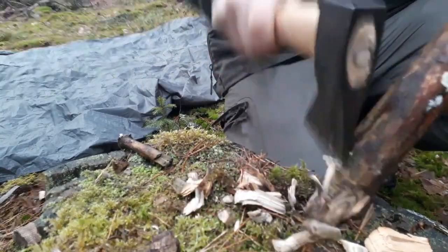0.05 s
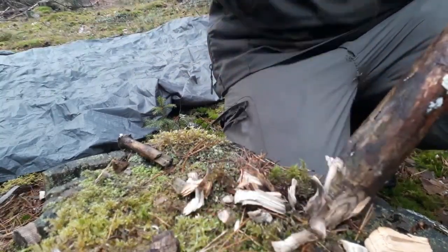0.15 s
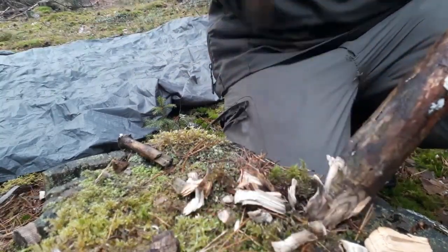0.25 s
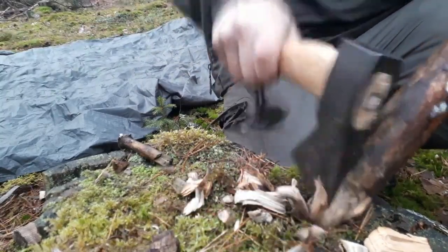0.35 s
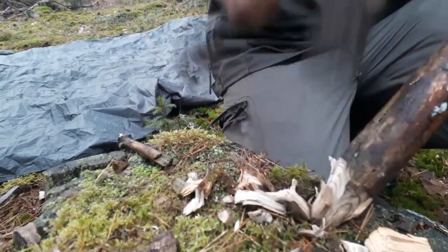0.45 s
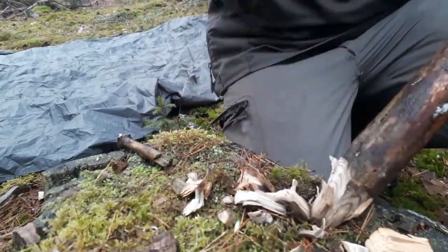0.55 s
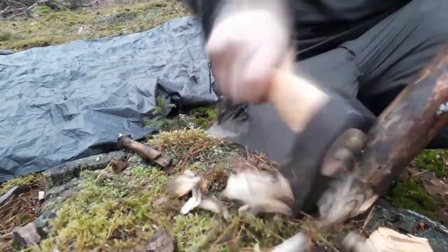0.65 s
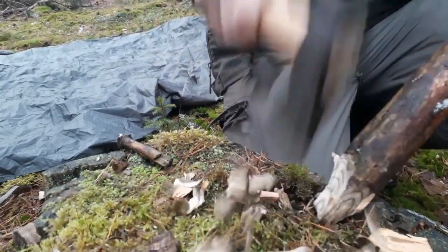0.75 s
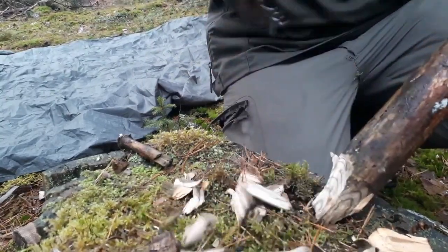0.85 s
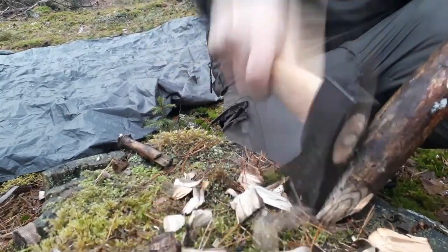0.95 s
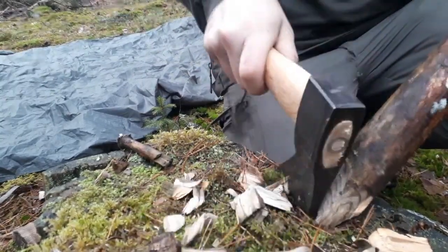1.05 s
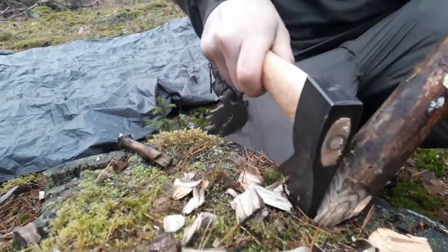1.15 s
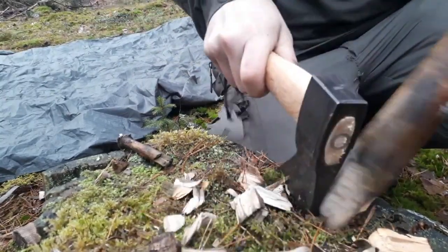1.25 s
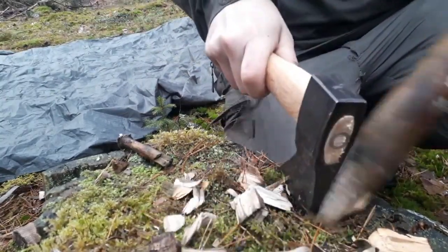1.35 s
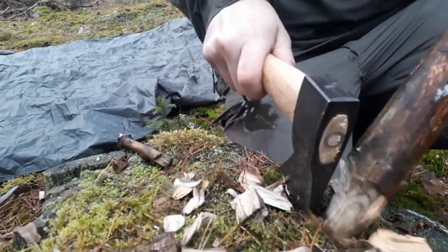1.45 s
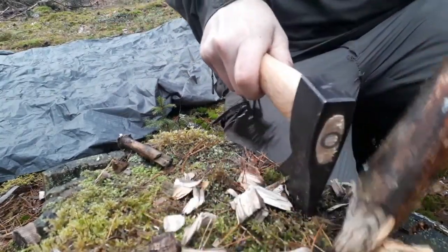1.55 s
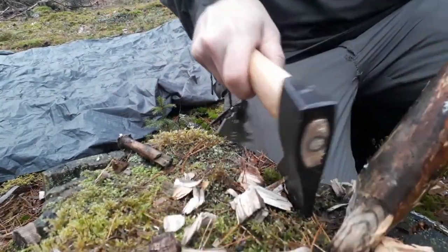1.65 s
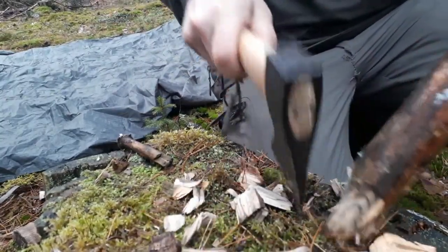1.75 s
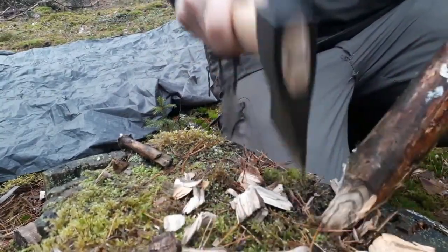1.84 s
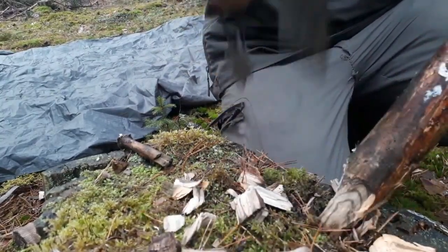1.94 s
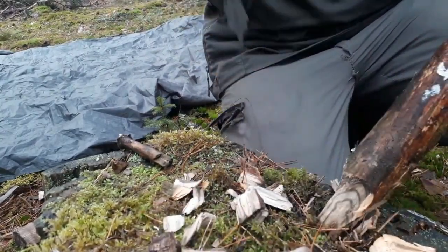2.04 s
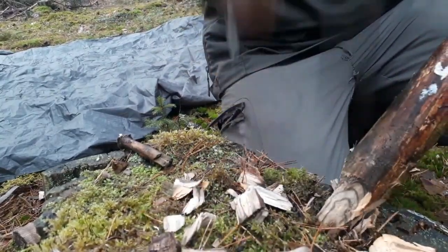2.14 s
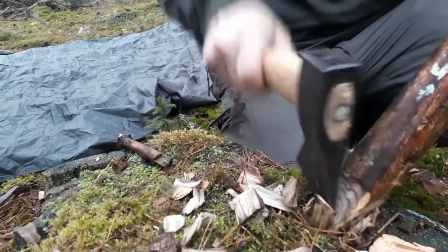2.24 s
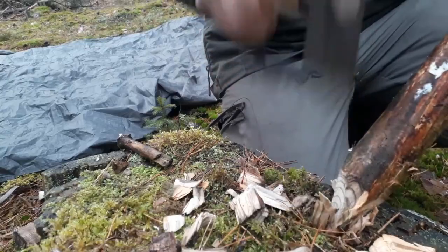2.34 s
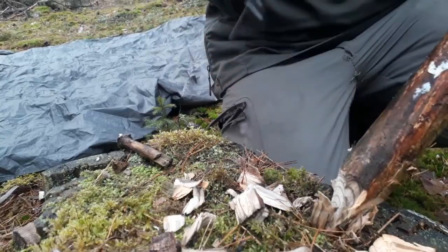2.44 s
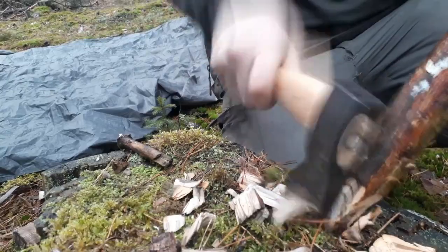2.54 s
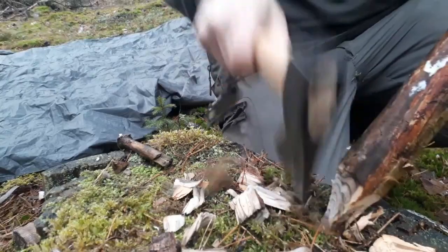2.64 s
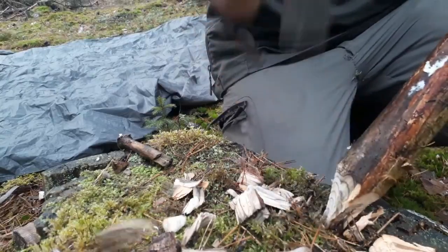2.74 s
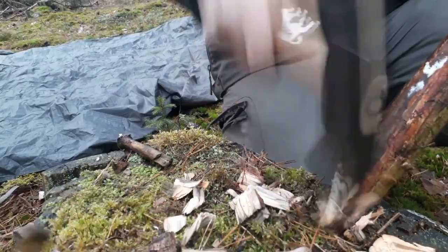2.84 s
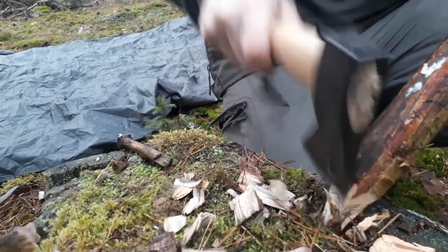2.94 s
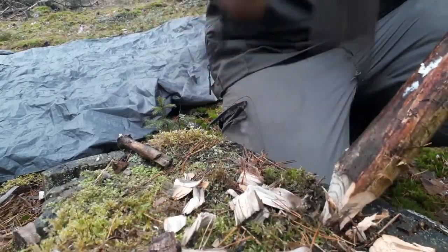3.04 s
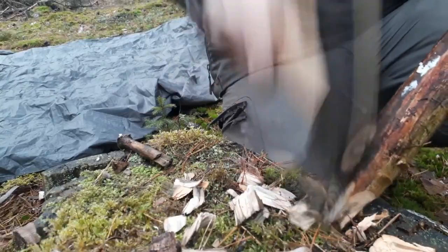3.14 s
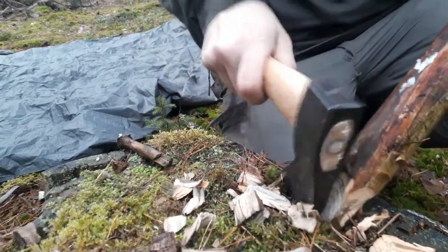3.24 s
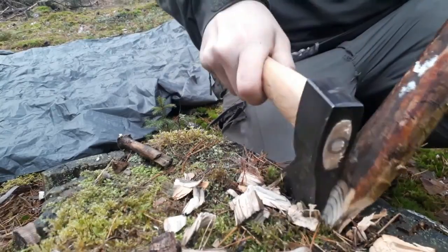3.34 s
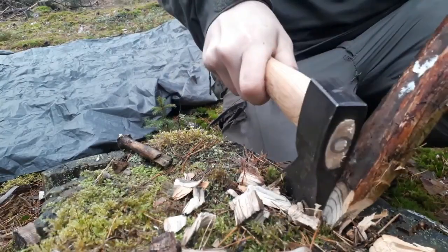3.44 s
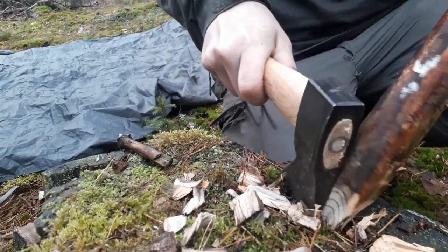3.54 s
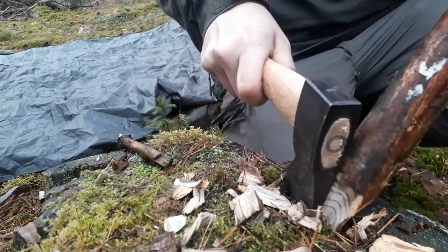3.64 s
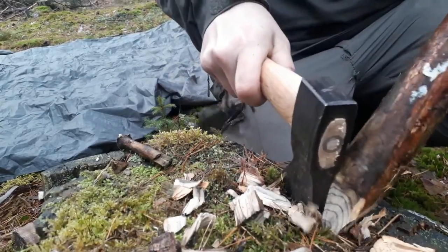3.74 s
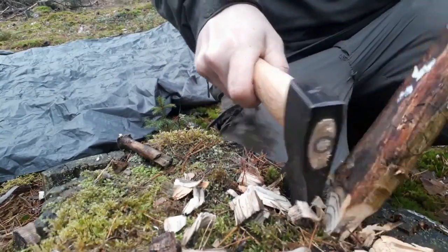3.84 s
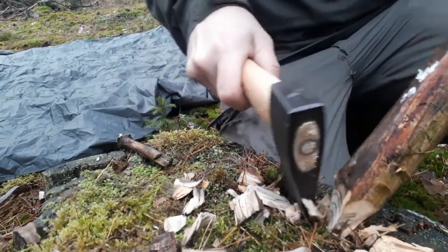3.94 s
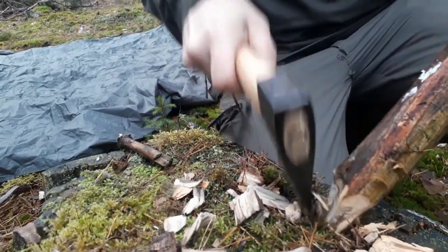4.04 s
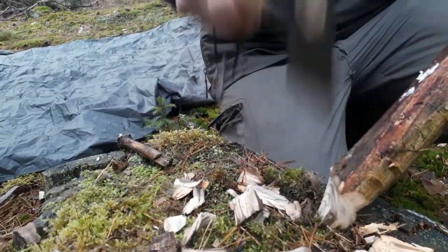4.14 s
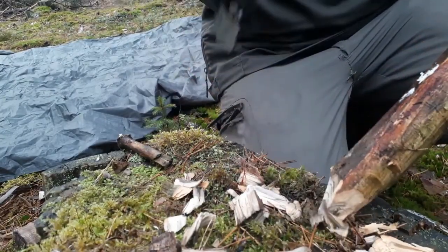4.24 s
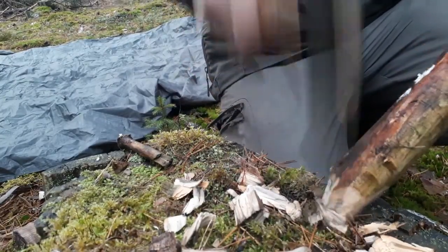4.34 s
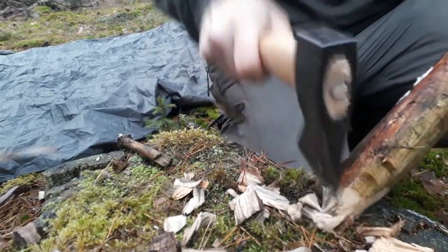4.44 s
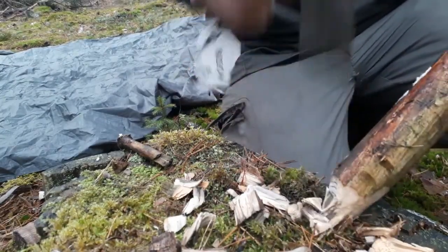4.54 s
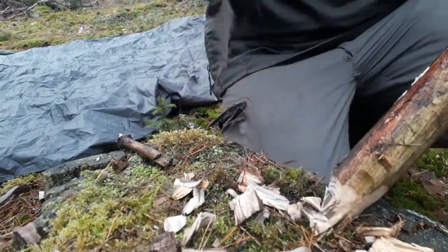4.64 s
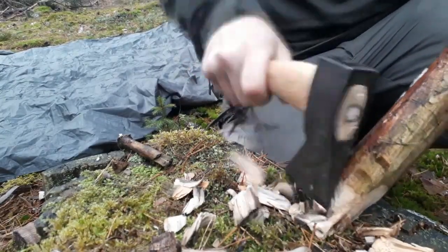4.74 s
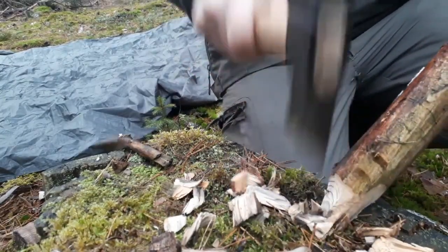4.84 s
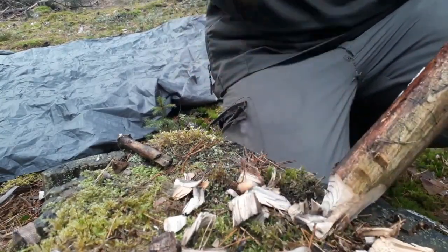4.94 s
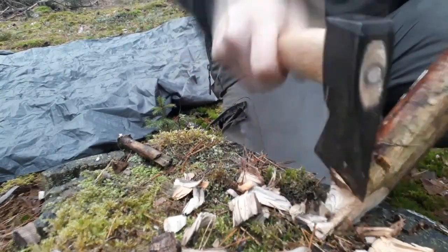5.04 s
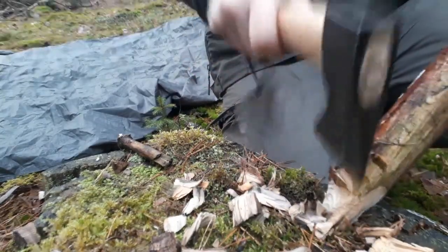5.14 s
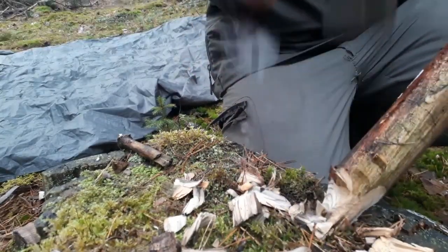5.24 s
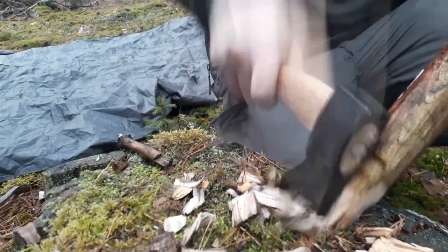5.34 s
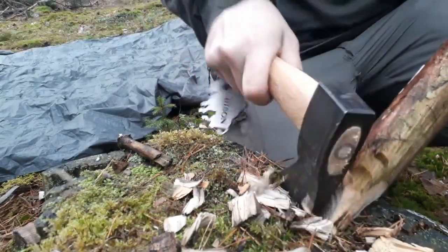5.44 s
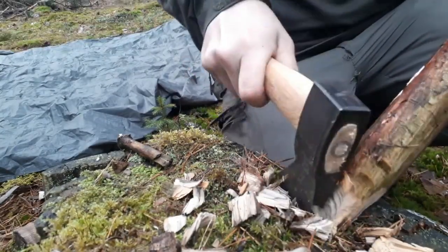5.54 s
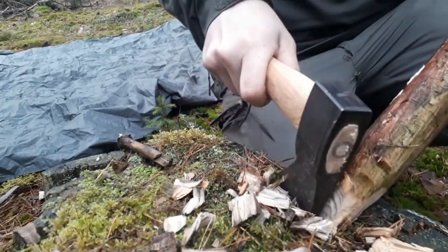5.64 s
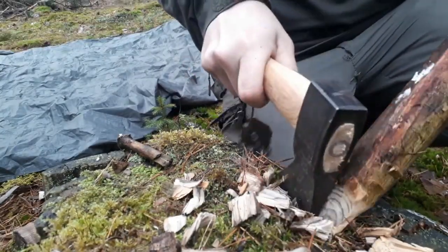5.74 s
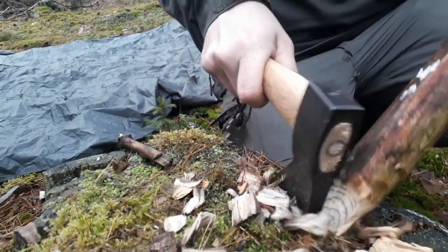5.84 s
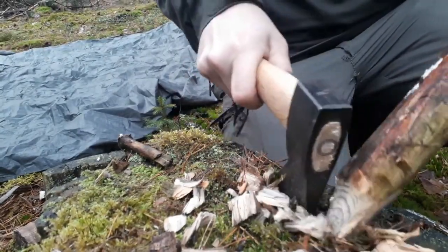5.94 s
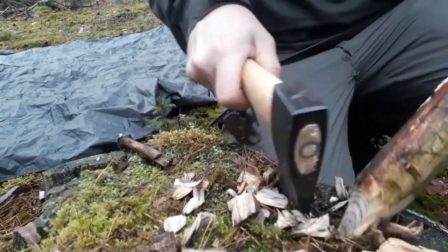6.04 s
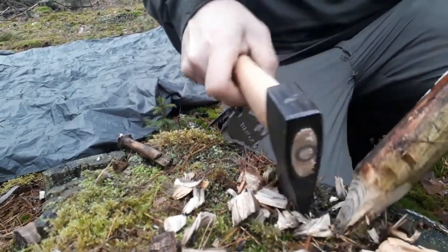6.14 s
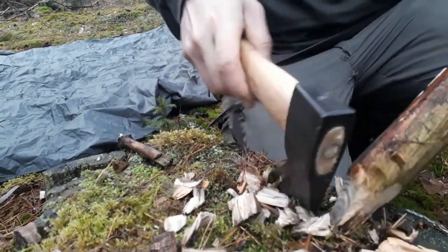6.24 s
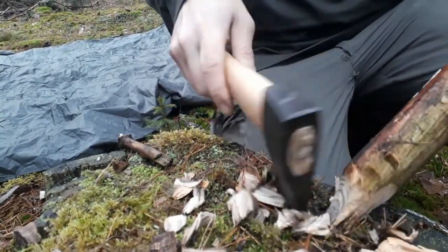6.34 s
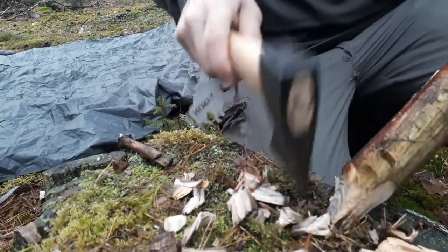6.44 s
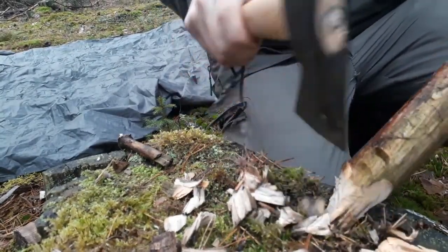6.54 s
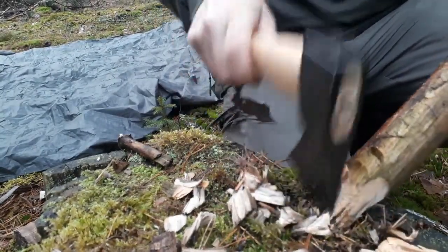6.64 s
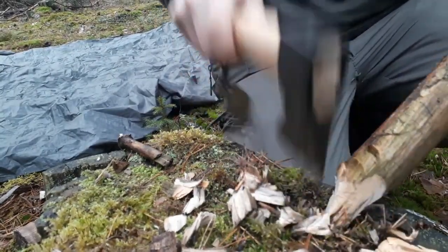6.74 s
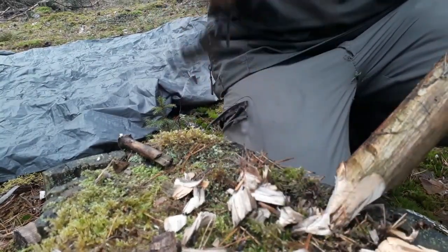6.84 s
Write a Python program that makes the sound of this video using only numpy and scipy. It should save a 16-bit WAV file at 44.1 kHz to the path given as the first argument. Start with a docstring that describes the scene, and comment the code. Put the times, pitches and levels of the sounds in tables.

```python
"""Pointing a stick with a hatchet

In a quiet forest, close to the microphone, a hatchet points the end of a stick on a mossy rock.
Each chop is a knock (a swing of pressure and ringing wood), a short tearing of fibres (bursts of tiny
snaps) and a thud into the ground. Now and then the blade clacks on the rock. The steel head rings as a
set of fading tones. Chips tick, and crumbs and sleeves rustle as filtered grains, over soft forest air."""
import sys
import numpy as np
from scipy import signal
from scipy.fft import rfft, irfft
from scipy.io import wavfile

SR = 44100
rng = np.random.default_rng(int(sys.argv[2]) if len(sys.argv) > 2 else 0)


def wav_record(signal):
    """Record a signal, one row per channel, as 16-bit PCM in the file named by sys.argv[1]."""
    frames = np.transpose(np.atleast_2d(signal))
    bounded = np.clip(frames, -1, 1)
    # unit amplitude maps onto the largest positive 16-bit level
    quanta = np.round(bounded * 32767).astype(np.int16)
    wavfile.write(sys.argv[1], SR, quanta)


N = 303408


def from_db(db):
    """Turn decibels into a plain gain."""
    return 10 ** (np.asarray(db) / 20)


def rms_one(x):
    """Scale a sound so that its average strength (rms) is 1."""
    return x / np.sqrt(np.mean(x ** 2) + 1e-20)


def seconds(length):
    """Make a time axis in seconds."""
    return np.arange(int(length * SR)) / SR


def add(track, start_s, sound):
    """Mix a sound into a track, cutting off what runs past the end."""
    at = int(np.clip(round(start_s * SR), 0, N - 1))
    track[at:at + len(sound)] += sound[:N - at]


def colour(x, spectrum):
    """Filter a sound to follow (frequency [Hz], gain [dB]) points, with the least possible delay."""
    size = 4096
    hz, db = np.transpose(spectrum)
    grid = np.maximum(np.fft.rfftfreq(size, 1 / SR), 1)
    gain = from_db(np.interp(np.log(grid), np.log(hz), db))
    # folding the cepstrum makes the filter causal and minimum-phase
    cepstrum = irfft(np.log(gain))
    cepstrum[1:size // 2] *= 2
    cepstrum[size // 2 + 1:] = 0
    impulse = irfft(np.exp(rfft(cepstrum)))
    return signal.fftconvolve(x, impulse)[:len(x)]


def resonate(x, modes, spread_db=0., detune=0.):
    """Ring side-by-side resonances; the two spreads vary their level and pitch at random in each call."""
    out = np.zeros(len(x))
    variations = rng.standard_normal((len(modes), 2))
    for k, ((hz, width, db), (louder, higher)) in enumerate(zip(modes, variations)):
        radius = np.exp(-np.pi * width / SR)
        angle = 2 * np.pi * hz * (1 + detune * higher) / SR
        feed = [(1 - radius ** 2) / 2, 0, (radius ** 2 - 1) / 2]
        feedback = [1, -2 * radius * np.cos(angle), radius ** 2]
        sign = (-1) ** k
        out += sign * from_db(db + spread_db * louder) * signal.lfilter(feed, feedback, x)
    return out


def grains(count, per_s, spread_db):
    """Scatter tiny clicks of uneven size over a number of samples; the rms is 1."""
    sizes = from_db(spread_db * np.minimum(rng.exponential(1, count), 4))
    signs = rng.choice([-1, 1], count)
    happens = rng.random(count) < per_s / SR
    return rms_one(sizes * signs * happens)


def push(hz):
    """A short contact sends out one main swing of pressure, down then up; peak near 1."""
    phase = 2 * np.pi * hz * seconds(.25) - 1.25 * np.pi
    return 1.3 * np.sin(phase) * np.exp(-phase * phase / 8)


def with_energy_of(x, envelope):
    """Give a burst the same energy as its envelope."""
    return rms_one(x) * np.sqrt(np.mean(envelope ** 2))


# colour of snapping fibres, bark and grit: (frequency [Hz], gain [dB])
SNAP_COLOUR = [(500, -16), (1800, 2.5), (3200, -3), (4600, -2), (6600, 0), (8700, -2), (10500, -15),
               (12400, -15), (14900, -10), (16000, -9)]


def blows(contacts, modes, direct_db, ring_db):
    """Each contact gives a pressure swing, crushes a little bark or grit and makes the struck body ring."""
    out = np.zeros(N)
    for start_s, db, hz, grit_db in contacts:
        swing = from_db(db) * push(hz)
        crushed = np.abs(swing) * grains(len(swing), per_s=5000, spread_db=-3.5)
        grit = colour(crushed, SNAP_COLOUR)
        body = resonate(swing, modes, spread_db=3.0, detune=0.052)
        add(out, start_s, from_db(direct_db) * swing + from_db(ring_db) * body + from_db(grit_db) * grit)
    return out


# colour of the quiet forest: (frequency [Hz], gain [dB])
AIR_COLOUR = [(15, -48.5), (25, -20), (108, 2), (130, -3.5), (190, -2), (373, -6.5), (463, -11.5),
              (911, -10), (1740, -18.5), (2610, -17.5), (5730, -28.5), (8360, -25.5), (16000, -35.5)]


def forest_air(level_db=-64.47):
    """Still air is steady random noise, filtered to the colour of the forest."""
    return from_db(level_db) * rms_one(colour(rng.standard_normal(N), AIR_COLOUR))


# colour of fine crumbs, cloth and bark: (frequency [Hz], gain [dB])
RUSTLE_COLOUR = [(410, -33.5), (700, -6), (1140, 3.5), (1580, -3), (2590, 2), (3110, -7.5), (7890, -4.5),
                 (10700, -15.5), (16000, -12.5)]
# the stick is turned and the sleeve rubs: (middle time [s], half length [s], level [dB])
RUBS = [(0.198, .014, -53.5), (1.344, 0.026, -57.5), (1.439, 0.042, -59.5), (1.554, 0.09, -67),
        (1.809, 0.077, -65.5), (3.6, 0.27, -70), (4.1, .08, -74), (4.953, 0.083, -66), (5.377, .012, -54),
        (5.798, 0.074, -67), (5.903, 0.018, -60.5), (6.217, 0.1, -68), (6.45, .025, -67)]


def rustle(cloth_db=-80, coarse_per_s=53, coarse_db=-6):
    """Fine grains: crumbs of bark patter after each chop, cloth and bark rub; coarser grains tick too."""
    crumbs_db, rise_s, fade_s = -51, .035, .06
    follow = 0.1   # dB of crumbs per dB of knock
    t = np.arange(N) / SR
    shower = (1 - np.exp(-(t / rise_s) ** 2)) * np.exp(-t / fade_s)
    level = np.zeros(N)
    for start_s, knock_db, *_ in CHOPS:
        add(level, start_s, from_db(crumbs_db + follow * knock_db) * shower)
    for middle_s, half_length_s, db in RUBS:
        level += from_db(db) * np.exp(-np.minimum(((t - middle_s) / half_length_s) ** 2, 20))
    level += from_db(cloth_db)   # the sleeve is never quite still
    fine = rms_one(colour(grains(N, per_s=8000, spread_db=5.), RUSTLE_COLOUR))
    coarse = rms_one(colour(grains(N, coarse_per_s, spread_db=6.0), SNAP_COLOUR))
    return level * (fine + from_db(coarse_db) * coarse)


# the chops: (time [s], knock level [dB], knock pitch [Hz], split after [s], split length [s],
# crackle level [dB], wood level [dB], chip pitch [Hz], ground after [s], thud level [dB])
CHOPS = [(0.0411, -10.5, 680, 0.00064, 0.003, -19, -18.5, 1040, 0.011, -15.5),
         (.3672, -13, 640, 0.00085, 0.0083, -17, -22.5, 1650, 0.0052, -22.5),
         (0.6918, -6.5, 625, 0.0081, 0.017, -23.5, -19.5, 800, 0.013, -16.5),
         (1.0115, -6, 760, 0.0016, 0.0042, -17.5, -15.5, 1200, .0195, -16),
         (2.2165, -12.5, 594, 0.0018, 0.0077, -15.5, -21, 1620, 0.0035, -21),
         (2.569, -15.5, 420, 0.014, 0.0048, -21.5, -16.5, 990, .0162, -16),
         (2.8931, -12.5, 563, .0008, 0.0064, -17, -21, 1080, 0.00038, -20),
         (3.1912, -5.5, 724, .0027, 0.003, -14.5, -12.5, 987, 0.015, -12),
         (4.4321, -14, 700, 0.0018, .0043, -12, -15.5, 1630, 0.0046, -21.5),
         (4.7795, -13, 465, 0.00034, .011, -17.5, -31, 1560, 0.0037, -17.5),
         (5.1022, -12.5, 500, 0.00069, 0.0021, -14, -14.5, 990, 0.011, -20.5),
         (5.4038, -15.5, 414.6, 0.0041, 0.014, -22, -20, 760, 0.016, -16),
         (6.6813, -34, 399.4, 0.00064, 0.0069, -42.5, -43, 1000, 0.00044, -37)]
# low bumps: the stick or hatchet settles on the moss, or a rock clack pushes the handle:
# (time [s], level [dB], pitch [Hz])
BUMPS = [(.159, -39, 335), (1.192, -31, 302), (5.243, -26.5, 300), (5.904, -47, 201), (5.929, -47, 281.6),
         (6.726, -49, 197)]
# moss stiffens as it is pressed, so a heavier thud is higher: (thud level [dB], pitch [Hz])
THUD_PITCH = [(-22.5, 165), (-13.5, 203)]


def chop_stages(bark_grit_db=-5.5, moss_grit_db=-31.5):
    """A chop is a knock, grinding with a split, and a thud; a heavier thud means louder grinding."""
    grind_crackle_db, grind_wood_db = -16.5, -5.0   # against the thud's listed level
    grind_hz, grind_overrun_s = 640, 0.0023   # the grinding outlasts the arrival at the ground
    knocks, tears, thuds = [], [], []
    for (start_s, knock_db, knock_hz, split_after_s, split_length_s,
         snap_db, wood_db, chip_hz, ground_after_s, thud_db) in CHOPS:
        knocks.append((start_s, knock_db, knock_hz, bark_grit_db))
        tears.append((start_s, ground_after_s + grind_overrun_s,
                      thud_db + grind_crackle_db, thud_db + grind_wood_db, grind_hz))
        tears.append((start_s + split_after_s, split_length_s, snap_db, wood_db, chip_hz))
        thud_hz = np.interp(thud_db, *np.transpose(THUD_PITCH))
        thuds.append((start_s + ground_after_s, thud_db, thud_hz, moss_grit_db))
    for bump in BUMPS:
        thuds.append((*bump, moss_grit_db))
    return knocks, tears, thuds


# resonances of the stick: (frequency [Hz], width [Hz], level [dB])
STICK_MODES = [(290, 64, 2.5), (464, 41, 1.5), (633, 29, -3), (784, 81, 1), (1043, 130, -2.5),
               (1223, 380, -5), (1645, 120, -4.5), (1800, 100, -8.5)]


def knocks_on_wood(knocks):
    """The blade strikes the stick, crushes a little bark and makes the wood ring."""
    return blows(knocks, STICK_MODES, direct_db=-0.5, ring_db=-2.0)


def splinters(t, per_s, spread_db):
    """The wood gives way in steps: each splinter is a sudden load that drains away."""
    count = 64
    starts = np.concatenate([[0], np.cumsum(rng.uniform(.4, 1.6, count)) / per_s])
    loads = from_db(spread_db * rng.uniform(-1, 1, count + 1))
    current = np.searchsorted(starts, t, side="right") - 1
    return loads[current] * np.exp(-(t - starts[current]) * per_s)


def cuts(tears, rise_s=.0005, fade_s=0.0024, body_db=-3.5, chip_db=-9.5):
    """Fibres snap in a dense burst while the blade advances, and shake the stick and the chip."""
    out, t = np.zeros(N), seconds(.15)
    for start_s, length_s, snap_db, wood_db, chip_hz in tears:
        advance = (1 - np.exp(-t / rise_s)) * np.exp(-np.maximum(t - length_s, 0) / fade_s)
        steps = splinters(t, per_s=450, spread_db=4.5)
        snaps = advance * steps * grains(len(t), per_s=12000, spread_db=3.)
        crackle = colour(snaps, SNAP_COLOUR)
        stick = resonate(snaps, STICK_MODES, spread_db=2.5, detune=0.043)
        chip = resonate(snaps, [(chip_hz, 135, 0)])   # one resonance, 135 Hz wide
        layers = [(crackle, snap_db), (stick, wood_db + body_db), (chip, wood_db + chip_db)]
        for sound, db in layers:
            add(out, start_s, from_db(db) * with_energy_of(sound, advance))
    return out


# ground and leaning stick, damped by moss: (frequency [Hz], width [Hz], level [dB])
GROUND_MODES = [(135, 32, 3), (230, 80, -8), (88, 20, -10)]


def thuds_on_ground(thuds):
    """Each thud or bump is a low swing of pressure with a low, damped ring."""
    return blows(thuds, GROUND_MODES, direct_db=-1.0, ring_db=-8.0)


# sound scattered by nearby ground and body: (frequency [Hz], gain [dB])
SCATTER_COLOUR = [(60, 5), (200, 10.5), (600, -11.5), (1600, -8.5), (3500, -5), (16000, -16.5)]


def echoes(x, t60_s, rise_s, level_db):
    """Many small reflections build up quickly and die away by 60 dB in t60_s."""
    t = seconds(0.8)
    fade = np.exp(-np.log(1000) * t / t60_s) * (1 - np.exp(-(t / rise_s) ** 2))
    tail = rng.standard_normal(len(t)) * fade
    return from_db(level_db) * signal.fftconvolve(x, tail / np.sqrt(np.sum(tail ** 2)))[:N]


# larger chips and twigs snap or land: (time [s], crackle level [dB], wood tone level [dB])
TICKS = [(0.162, -58, -36.5), (0.656, -36.5, -37.5), (.9539, -55, -41.5), (1.192, -36, -33),
         (1.483, -45, -49), (1.502, -38.5, -51), (1.5942, -47.5, -52.5), (1.8141, -41.5, -60),
         (2.129, -55, -67), (3.313, -51, -42), (3.4173, -41, -51.5), (3.6155, -48.5, -62),
         (4.6422, -53.5, -58.5), (5.9354, -46.5, -56), (6.722, -45, -47.5)]


def ticks(fade_s=0.0023):
    """Small dry pieces give a brief crackle with a little wood tone."""
    out, t = np.zeros(N), seconds(.08)
    fade = np.exp(-t / fade_s)
    for start_s, crackle_db, wood_db in TICKS:
        snaps = fade * grains(len(t), per_s=2000, spread_db=-1.0)
        crackle = colour(snaps, SNAP_COLOUR)
        wood = resonate(snaps, STICK_MODES, detune=0.32)
        add(out, start_s, from_db(crackle_db) * with_energy_of(crackle, fade))
        add(out, start_s, from_db(wood_db) * with_energy_of(wood, fade))
    return out


# tones of the steel head: (frequency [Hz], level [dB], time to fade by 60 dB [s])
STEEL_MODES = [(2308, 0, .45), (2791, 0, 1.3), (4412, 0, .42), (5272, 0, .47), (5875, 0, .55),
               (6425, 0, .3), (7810, 0, .45), (9505, -10, .3), (10025, -1, .26), (11220, -1, .25),
               (12295, 0, .2), (14830, -4, .18), (15530, -9, .22)]
# the head rings until wood or moss damps it, and swells slowly when the blade slides out of the cut;
# a harder contact is brighter. The blade and twist levels depend on where the edge is caught:
# (time [s], free for [s], rise [s], lowest tone level [dB], tilt of higher tones [dB per octave],
# blade level [dB], twist level [dB])
RINGS = [(.658, .034, .001, -75.5, 5, -67, -83.5), (.726, 0.26, 0.008, -51.5, -2.5, -35, -69.5),
         (1.1716, 0.011, .0004, -36.5, -3, -28, -46.5), (1.189, 0.13, .002, -51.5, 1, -49, -62.5),
         (2.311, .085, 0.017, -60.5, -14, -79, -76), (2.394, .176, .003, -65, -5, -65, -73),
         (2.6078, .583, 0.00077, -37, -16, -45, -39.5), (2.71, 0.54, 0.0019, -64.5, -3, -52, -63),
         (3.313, 0.24, 0.0023, -53.5, -7.5, -56.5, -79), (4.395, .04, .001, -48, -3.5, -67, -65),
         (4.465, .18, 0.063, -35.5, -16.5, -69.5, -77), (4.857, .242, 0.014, -54.5, -6.5, -57, -72),
         (5.238, 0.12, 0.0098, -51, 5.5, -41.5, -37), (5.468, 0.11, 0.027, -63, -5.5, -65, -82)]
# tones of the thin blade: {frequency [Hz]: added level [dB]}
BLADE_MODES = {5272: -4, 7810: 1}
TWIST_HZ = 2791   # the long twisting tone


def steel(turn_hz=6.4, damp_s=0.014, level_db=1.0, swing_m_per_s=0.67, swing_hz=0.84):
    """The free head rings; its swing bends the pitch and sweeps each tone's lobes past the microphone."""
    mirrored, waver = .5, .4
    out, t = np.zeros(N), seconds(.7)
    lag_s = np.cumsum(swing_m_per_s * np.sin(2 * np.pi * swing_hz * t)) / SR / 343   # sound: 343 m/s
    lowest_hz = STEEL_MODES[0][0]
    for start_s, free_s, rise_s, head_db, tilt, blade_db, twist_db in RINGS:
        free = (1 - np.exp(-(t / rise_s) ** 2)) * np.exp(-np.maximum(t - free_s, 0) / damp_s)
        variations = rng.random((len(STEEL_MODES), 3))
        for (hz, db, t60_s), (pace, angle, path) in zip(STEEL_MODES, variations):
            lobes = 1 + waver * np.cos(2 * np.pi * (turn_hz * (.5 + pace) * t + angle))
            # the reflection from the rock moves the other way, so the two tones beat
            direct = np.sin(2 * np.pi * hz * (t - lag_s))
            reflected = mirrored * np.sin(2 * np.pi * (hz * (t + lag_s) + path))
            if hz in BLADE_MODES:
                struck_db = blade_db + BLADE_MODES[hz]
            elif hz == TWIST_HZ:
                struck_db = twist_db
            else:
                struck_db = head_db + tilt * np.log2(hz / lowest_hz)
            fade = np.exp(-np.log(1000) * t / t60_s)
            gain = from_db(level_db + db + struck_db)
            add(out, start_s, gain * lobes * free * fade * (direct + reflected))
    return out


# the blade meets the rock: (time [s], level [dB], contact pitch [Hz], grit level against the blow [dB])
CLACKS = [(.7305, -5.5, 1190, -18), (.7358, -9, 1410, -15), (1.1709, -9.5, 1020, 1),
          (2.6093, -2, 1430, -18.5), (4.3915, -27, 900, -6.5), (5.2415, -10, 1030, -6),
          (5.4302, -8, 1026, -15)]
# the wooden handle, jarred by the rock: (frequency [Hz], width [Hz], level [dB])
HANDLE_MODES = [(530, 230, -8), (935, 220, 0.5), (1300, 52, -3.5), (1740, 270, 4.5), (2040, 73, -9)]


def clacks_on_rock():
    """The blade hits rock, crushes grit and jars the wooden handle."""
    return blows(CLACKS, HANDLE_MODES, direct_db=-0.5, ring_db=0.0)


def scene():
    """Mix the chopping, its reflections from ground and trees, and still forest air."""
    knocks, tears, thuds = chop_stages()
    chopping = knocks_on_wood(knocks) + cuts(tears) + thuds_on_ground(thuds) + ticks() + clacks_on_rock()
    # such small bodies radiate little deep bass
    bass_cut = signal.butter(3, 75, "high", fs=SR, output="sos")
    chopping = signal.sosfilt(bass_cut, chopping)
    near = echoes(colour(chopping, SCATTER_COLOUR), t60_s=.125, rise_s=0.01, level_db=-18.0)
    trees = echoes(chopping, t60_s=0.31, rise_s=0.014, level_db=-37.5)
    return (forest_air() + rustle() + chopping + near + trees + steel())[None]


def record(dry):
    """The microphone rounds the highest peaks; the top is cut above 16 kHz."""
    rounded = .9 * np.tanh(dry / .9)
    top_cut = signal.ellip(10, .2, 70, 16000, fs=SR, output="sos")
    return signal.sosfilt(top_cut, rounded)


dry = scene()
out = record(dry)
wav_record(out)
```